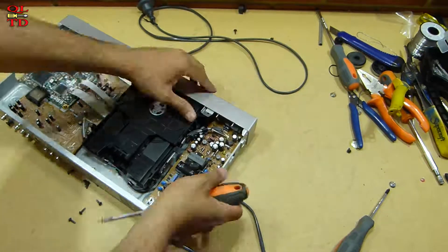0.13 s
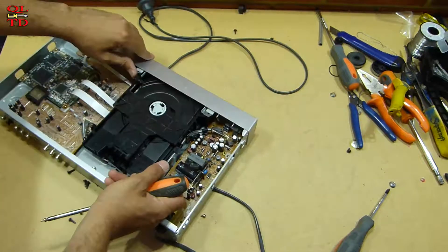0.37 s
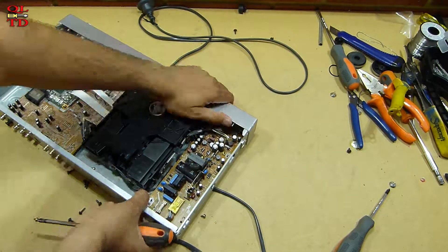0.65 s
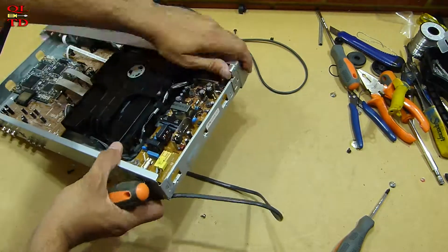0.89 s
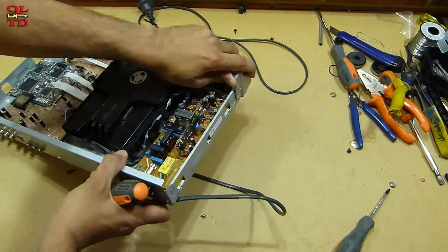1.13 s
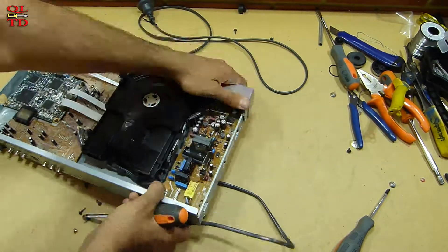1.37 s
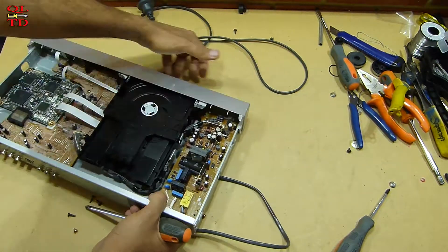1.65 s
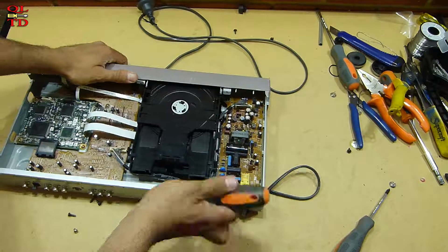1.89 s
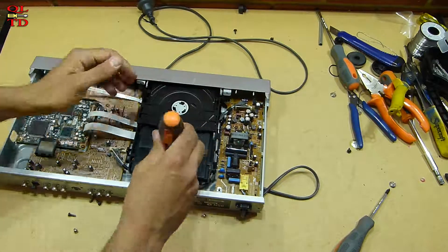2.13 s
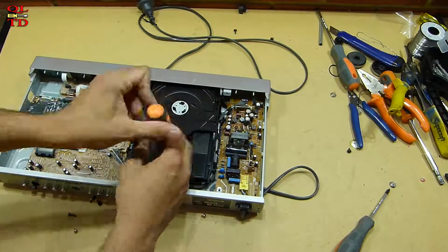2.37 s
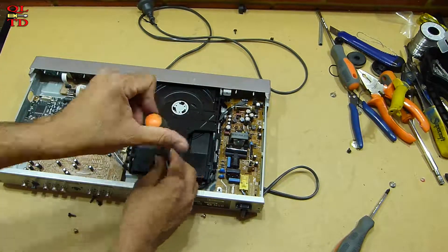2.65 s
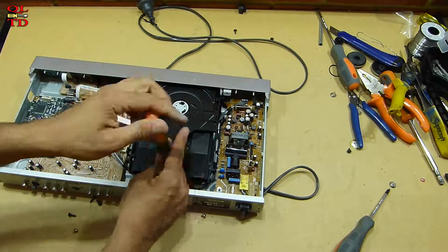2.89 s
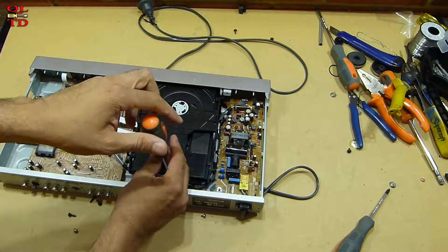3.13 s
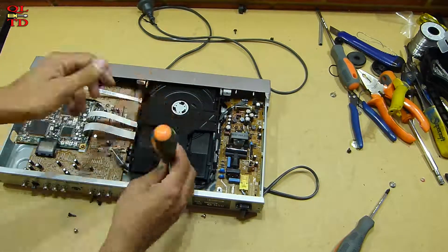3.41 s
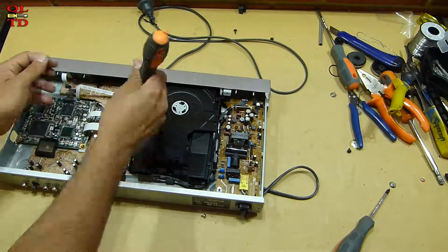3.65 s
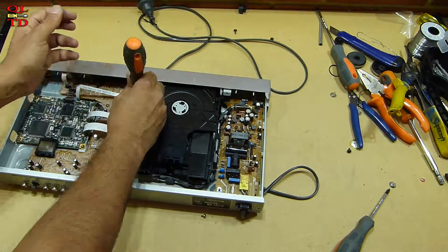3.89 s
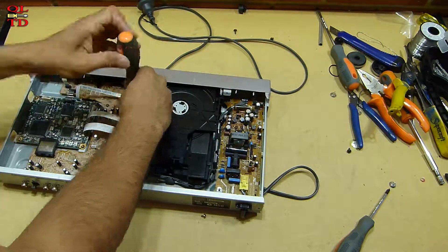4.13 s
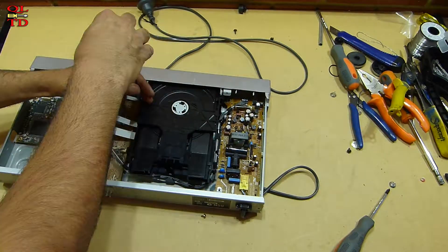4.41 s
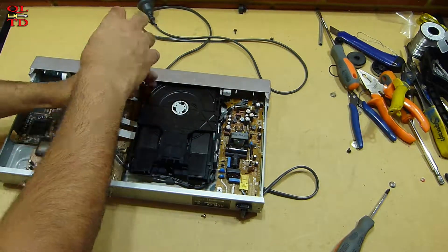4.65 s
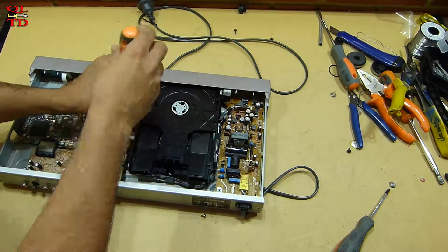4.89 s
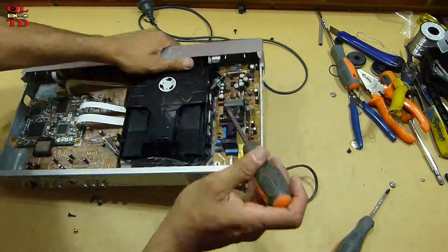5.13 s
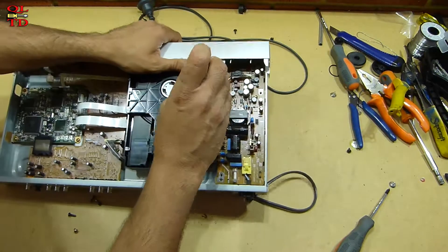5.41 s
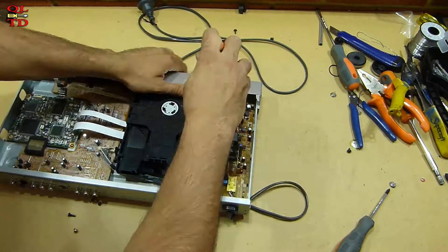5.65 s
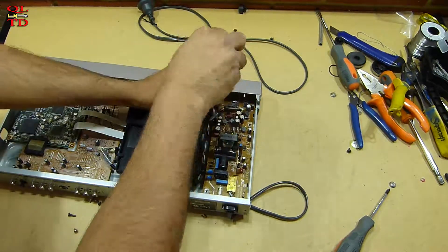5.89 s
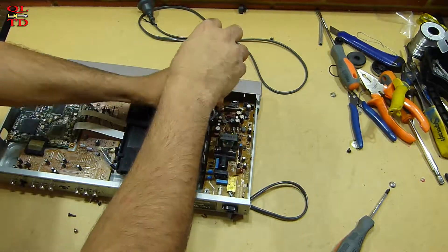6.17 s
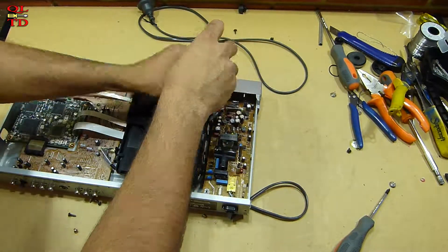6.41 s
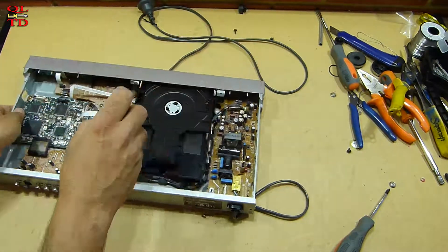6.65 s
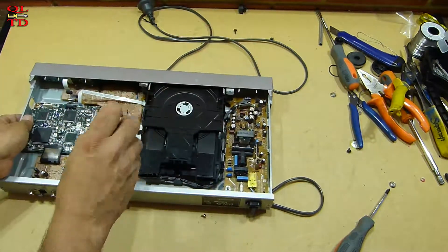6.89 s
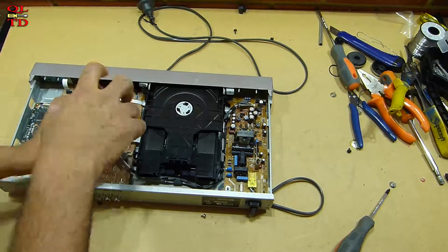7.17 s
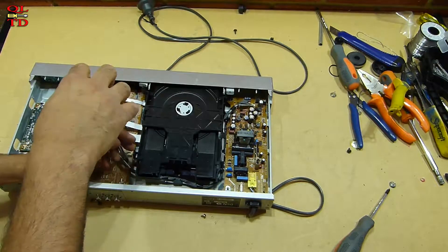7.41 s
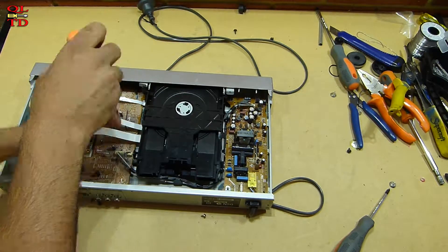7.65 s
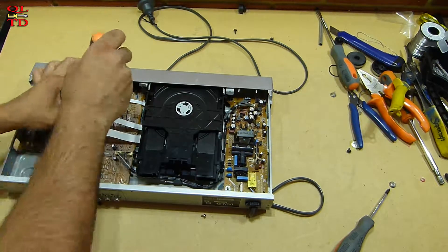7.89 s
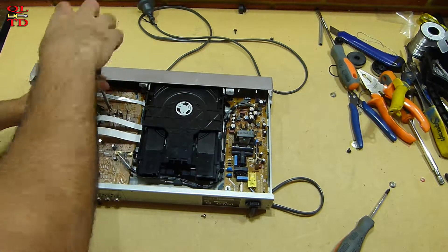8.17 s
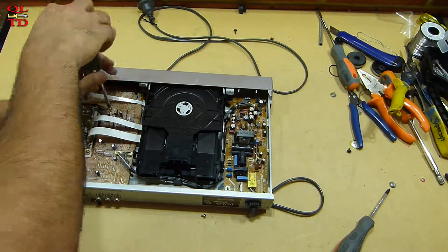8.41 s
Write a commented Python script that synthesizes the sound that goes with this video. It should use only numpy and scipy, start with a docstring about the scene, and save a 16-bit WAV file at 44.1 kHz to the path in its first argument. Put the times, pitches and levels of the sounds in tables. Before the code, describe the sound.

An open sheet-metal casing is dragged over a wooden workbench, grating and whistling thinly, with three hollow knocks in the first two seconds. Then it rests while a screwdriver taps, skids and scrapes on steel and plastic, with dull hand rubs on the wood. Gripping hands later shorten the ring. Clicks grow dense near the end. Close stereo microphone, small dry room, light hiss.

```python
"""Hands first drag an open sheet-metal chassis over a wooden workbench: feet grate, edges whistle, its hollow booms.
After about two seconds it rests and a screwdriver taps, slips and scrapes; palms rub the wood for a while.
From 5 to 7.3 s hands grip the casing and its ring is shorter; taps and scrapes go on to the end.
Noise bursts shake ringing bodies (bench, plastic tray, thin steel) for taps and slips, uneven noise for rubbing.
Filtered noise gives the small dry room's hiss and murmur throughout; a close stereo microphone listens."""
import sys
import numpy as np
from scipy import signal
from scipy.fft import rfft, irfft
from scipy.io import wavfile
from scipy.ndimage import uniform_filter1d

SR = 44100
rng = np.random.default_rng(int(sys.argv[2]) if len(sys.argv) > 2 else 0)


def inscribe(sig):
    """Save sig as 16-bit PCM at rate SR to the path in sys.argv[1].

    A 1-D sig is mono; a 2-D sig holds one channel per row.
    Samples are clipped to [-1, 1] before scaling.
    """
    pcm = np.round(np.clip(np.atleast_2d(sig).T, -1, 1) * 32767)
    wavfile.write(sys.argv[1], SR, pcm.astype(np.int16))


def volts(x):
    """Linear amplitude factor 10**(x/20) for a level x in dB, scalar or array-like."""
    e = np.asarray(x, float) / 20
    return 10 ** e


N = 376173  # length in samples

# Ringing modes of each body: f/Hz, relative level/dB, t60/s (time to fade by 60 dB, when no hand grips)
BENCH_MODES = [(231, -3, 0.29), (329.5, 25, 0.048), (375, 23, 0.027), (519, 19.5, 0.019)]
TRAY_MODES = [(845, 5.3, 0.068), (1010, 6.6, 0.034), (1135, 13.8, 0.016), (1370, 13.8, 0.021),
              (1660, 11.2, 0.04)]
STEEL_MODES = [(2100, -4, .03), (2190, -4, .03), (2330, -3, .04), (2535, -3, .05), (2660, -3, .04),
               (2760, -4, .03), (3010, -3, .03), (3140, -1, .02), (3470, -3, .03)]
CRACK_MODES = [(3514, 0.65, 0.032), (3970, 6.5, 0.012), (4426, 14.1, 0.0051), (5620, 13.1, 0.0033),
               (6000, 0.54, 0.009), (6570, 5.3, 0.0047)]  # lower treble of the metal
SIZZLE_MODES = [(8100, 11.5, 0.0019), (9320, 11.8, 0.0013), (11150, 6.6, 0.0018), (12800, 1.6, 0.0042)]  # upper treble of the metal
# Favoured pitches, depending on where hand or tool bears: t/s, steel f/Hz, tray f/Hz, crack f/Hz
SPOT_PITCHES = [(0.02, 2640, 1400, 5930), (.74, 2290, 1090, 4330), (.95, 1990, 1320, 3540),
                (1.18, 3000, 1370, 6200), (1.36, 2060, 945, 3820), (1.62, 2440, 824, 4040),
                (2.14, 2310, 960, 5500), (2.75, 2454, 830, 6500), (3.68, 2640, 1430, 3570),
                (4.8, 2675, 1370, 5900), (5.09, 2490, 1030, 4450), (5.4, 3410, 1580, 4190),
                (6.28, 3120, 1170, 4000), (6.9, 2510, 1500, 3480), (7.47, 2390, 1510, 3860),
                (8.5, 2570, 1500, 4840)]
SLIDE_END_S = 1.95  # dragged until then; afterwards the chassis rests and the screwdriver works


def taps():
    """Sudden contacts ring every body with a dying noise burst; a short push also shoves the bench top."""
    # Taps, energy as that of a 1 ms burst: t/s, steel level/dB, brightness/dB (sizzle over steel),
    # bench level/dB, tray level/dB
    tap_table = [(0.0164, -15.5, 7.5, -20, -21.5), (0.042, -43, 20, -25.5, -53),
                 (0.345, -28.5, 6.5, -28, -29), (0.354, -36, 2, -18.5, -47), (0.457, -34, 6.5, -56, -41),
                 (0.366, -15, 1.5, -43, -23), (0.5559, -20.5, 2.5, -17, -22),
                 (0.5994, -24.5, 0.5, -33, -29.5), (0.68, -19, -3.5, -14.5, -19),
                 (0.742, -21, 7.5, -58, -38), (0.7683, -32.5, 11, -38, -47), (0.7867, -28.5, 4.5, -42, -37),
                 (0.9332, -40.5, 16, -22.5, -28), (0.9693, -45, 28, -33, -36), (0.986, -42, 18, -43, -42),
                 (1.0224, -47, 24, -44, -50), (1.045, -45.5, 28, -67, -38), (1.0825, -27, 8.5, -45, -29),
                 (1.1103, -23, -2, -31, -28.5), (1.138, -26.5, 3, -48, -30),
                 (1.1773, -9.5, 1.5, -34.5, -16.5), (1.318, -50, 7, -52, -37),
                 (1.3641, -15.5, 1, -19.5, -21), (1.3896, -23, -24, -28, -29),
                 (1.513, -21.5, -2, -32, -30.5), (1.5371, -25, -4, -36, -35), (1.577, -31, -4, -52, -39),
                 (1.589, -31, 1, -52, -44), (1.6231, -16.5, -0.5, -15.5, -17), (1.702, -31, -8, -42, -39),
                 (1.72, -17.5, -8, -43, -25.5), (1.767, -26, 8, -17.5, -28), (1.799, -27, -1, -32, -38),
                 (1.841, -42, 0, -14.5, -34), (1.852, -16.5, 2.5, -30, -22), (1.863, -29, 3, -17.5, -36),
                 (2.0357, -18.5, -11, -27.5, -27), (2.143, -11.5, -4.5, -36, -25),
                 (2.1817, -22, -17, -55, -36), (2.219, -27, -10, -30, -34), (2.3179, -28, 6.5, -27, -31.5),
                 (2.4061, -22, -8.5, -30.5, -30.5), (2.6441, -23.5, -11.5, -37, -34.5),
                 (2.713, -24.5, -7, -26.5, -28), (2.7522, -9, -13.5, -23, -26),
                 (2.862, -7.5, -14, -23, -28.5), (2.985, -24, -9, -33, -37),
                 (3.0018, -14.5, -31, -37, -32.5), (3.006, -30.5, 2, -26, -34),
                 (3.1468, -11.5, -8, -30, -27), (3.21, -34, -10, -45, -46), (3.273, -18.5, -3.5, -28, -30),
                 (3.3231, -25, -5.5, -28.5, -30.5), (3.361, -24, -6, -36, -35), (3.392, -27, -7, -28, -52),
                 (3.462, -25, 4.5, -40, -35), (3.6777, -13.5, -0.5, -48, -27.5),
                 (3.7208, -29, -3, -49, -36), (3.7474, -26.5, -5, -30.5, -33),
                 (3.7694, -32, 19.5, -56, -37), (3.9027, -21, -2.5, -48, -29.5),
                 (3.9803, -10.5, -14.5, -35.5, -22.5), (4.127, -29, 11.5, -43.5, -56),
                 (4.175, -28.5, -5.5, -49, -32), (4.3417, -30.5, -12, -42, -37),
                 (4.386, -35.5, -0.5, -52, -40), (4.5013, -25.5, -23, -44, -32.5),
                 (4.541, -28, 3.5, -47, -34), (4.615, -19, -5.5, -47, -28.5), (4.649, -21, -11, -47, -29),
                 (4.7031, -17.5, -9, -40, -30), (4.7326, -10, -8, -32, -26), (4.7364, -13.5, -9, -37, -28),
                 (4.7534, -16, -7, -44, -26), (4.798, -19, -18, -43, -31), (5.063, -23.5, 8, -34, -39),
                 (5.0698, -21, 2, -58, -37), (5.0918, -19, -11, -30, -23), (5.1015, -21.5, 8, -56, -39),
                 (5.219, -57, 29.5, -66, -58), (5.2781, -20.5, -6.5, -62, -26),
                 (5.2845, -21.5, -9, -58, -25.5), (5.3827, -26, -6, -61, -29), (5.4041, -14, -3, -61, -18),
                 (5.4667, -22.5, -8.5, -64, -24.5), (5.484, -29, -8, -57, -27.5),
                 (5.5365, -17.5, -7, -30.5, -21), (5.5644, -40, 18, -54, -27),
                 (5.6104, -13.5, -4.5, -23.5, -21.5), (5.663, -17.5, -4.5, -55, -21.5),
                 (5.595, -28, -7, -55, -40), (5.988, -39.5, -9, -50, -33.5), (6.015, -35, -3, -53, -42),
                 (6.128, -18.5, -5, -39, -31.5), (6.161, -23, 0.5, -78, -32), (6.244, -27, -5, -57, -45),
                 (6.283, -9, -8, -38, -27.5), (6.3097, -15, -2, -41, -26), (6.3527, -26, -4, -54, -28),
                 (6.3748, -17.5, 4, -47, -31), (6.392, -10, -0.5, -40, -20.5),
                 (6.5724, -32.5, -1.5, -35.5, -37.5), (6.663, -25.5, -3, -41, -42),
                 (6.8411, -13, -0.5, -41, -27.5), (6.869, -15.5, -7, -57, -33),
                 (6.877, -14, -4.5, -64, -28.5), (6.9481, -6.5, -10, -56, -23), (6.967, -16, -11, -35, -34),
                 (7.01, -32, -13, -50, -52), (7.0849, -31, 15, -39, -40), (7.2552, -29.5, -7, -54, -35),
                 (7.2805, -24.5, -20, -54, -32.5), (7.315, -25.5, -5, -62, -37),
                 (7.4167, -15.5, -17, -52, -43), (7.444, -8.5, -14, -38, -18.5), (7.4742, -9, -7, -43, -22),
                 (7.8629, -12.5, -5.5, -43, -29), (7.897, -16.5, 0.5, -48, -32),
                 (7.953, -20.5, -17, -59, -37), (7.962, -11.5, 1.5, -41, -21), (8.077, -30, -18, -59, -58),
                 (8.109, -31.5, 13, -41.5, -47), (8.216, -29.5, -16, -48, -43),
                 (8.3758, -16, -19, -61, -29), (8.4127, -10.5, -10.5, -37, -20.5),
                 (8.441, -23, -11, -61, -49), (8.4735, -9, -13, -35, -42), (8.4814, -10, -13.5, -36, -24),
                 (8.4973, -12.5, -5, -32, -21.5), (8.5125, -11.5, -11, -45, -26)]
    snap_db, snap_s = 8, 0.0001  # the first touch is harder and shorter than the chatter after it
    thump_db, thump_s = -24, 0.0043  # peak over the bench column, length of the push
    s, steel, brightness, bench, tray = np.transpose(tap_table)
    push = np.hanning(int(thump_s * SR))
    thump = place(s, volts(bench + thump_db)[:, None] * push)

    def blow(t, contact_s):
        return np.exp(-t / contact_s) + volts(snap_db) * np.exp(-t / snap_s)

    return thump + strike(s, bodies(steel, brightness, bench, tray), blow)


def slips():
    """Short skids of the dragged chassis, later of the screwdriver: pressure swells and lets go, in uneven jerks."""
    # Slips, energy as for the taps: t/s, length/s (the swell takes 1.24 times this),
    # steel level/dB, brightness/dB (sizzle over steel), tray level/dB
    slip_table = [(0.276, 0.029, -26, 0, -34), (0.427, 0.021, -30, -1, -37),
                  (0.799, 0.002, -23.5, -1, -28.5), (0.943, 0.029, -16, -12, -22),
                  (1.004, 0.006, -52, 36.5, -54), (1.098, 0.0064, -28, 4, -46),
                  (1.464, 0.009, -23.5, -17, -38), (1.488, 0.024, -24.5, -10, -29),
                  (1.667, 0.0076, -42, 15, -40), (2.789, 0.012, -27.5, -15, -36),
                  (3.094, 0.0095, -30, -17, -34), (3.226, 0.019, -22.5, -3, -25),
                  (3.799, 0.022, -19.5, -2, -42), (4.457, 0.02, -29, -3, -35),
                  (4.581, 0.015, -24, -12, -34), (4.719, 0.0098, -19.5, 3, -22),
                  (4.775, 0.009, -16, -4, -28), (4.829, 0.017, -20, -10, -34),
                  (4.855, 0.025, -12.5, 5.5, -25.5), (4.895, 0.01, -18.5, 5, -44),
                  (5.018, 0.0099, -27, -7, -34), (5.157, 0.024, -29.5, -6, -32),
                  (7.162, 0.041, -32.5, -19, -50), (7.32, 0.036, -16, -15, -27),
                  (7.36, 0.0091, -8.5, -11.5, -21), (7.485, 0.0091, -10.5, -7.5, -26),
                  (7.57, 0.013, -14, -12, -29), (8.332, 0.032, -24, -16, -37)]
    bench_db = -25  # bench against steel
    s, length, steel, brightness, tray = np.transpose(slip_table)
    chance = rng.standard_normal((len(s), SR // 600 + 1))
    jerks = volts(3.4 * np.repeat(chance, 50, axis=1))  # about one jerk a millisecond

    def swell(t, _):
        progress = np.clip(t / (1.24 * length[:, None]), 0, 1)
        return jerks[:, :len(t)] * np.sin(np.pi * progress ** 0.58)

    return strike(s, bodies(steel, brightness, steel + bench_db, tray), swell)


def bodies(steel, brightness, bench, tray):
    """Level in dB of each body; a harder contact reaches further into the treble."""
    crack = steel + 1.19 + 0.56 * brightness
    return [steel, bench, tray, crack, steel + brightness]


def strike(times, body_db, shape):
    """Each contact is fresh chatter under shape(t, contact s), so every one weights the modes differently."""
    # Contact of steel, bench, tray, crack, sizzle, shaft:
    # contact time/s, side share (0-1), after-rattle level/dB, after-rattle t60/s
    contact_table = [(0.00076, 0.15, -9.5, 0.085), (0.0031, 0.12, -15, 0.16), (0.0026, 0.16, -2, 0.09),
                     (0.0015, 0.31, -6, 0.072), (0.0025, 0.55, -3.5, 0.082), (0.0002, 0.5, -18, 0.13)]
    # While a screw turns, the screwdriver shaft rings: from t/s, to t/s, level over the crack/dB
    turn_table = [(2.7, 3.45, -3.5), (4.3, 4.95, -7.5)]
    # Ringing mode of the shaft: f/Hz, relative level/dB, t60/s
    shaft_modes = [(5900, 0, 0.011)]
    bounce_db = 3  # unevenness of the after-rattle's bounces
    t = np.arange(SR // 12) / SR
    chance = rng.standard_normal((len(times), 12, len(t)))
    # a new bounce level every 2.5 ms
    steps = np.repeat(rng.standard_normal((len(times), 40)), SR // 400, axis=1)[:, :len(t)]
    bounces = volts(bounce_db * steps)
    turning = sum(volts(db) * (times > a) * (times < b) for a, b, db in turn_table)
    gains = [*volts(body_db), turning * volts(body_db[3])]
    all_modes = (STEEL_MODES, BENCH_MODES, TRAY_MODES, CRACK_MODES, SIZZLE_MODES, shaft_modes)
    out = 0
    for k, (modes, contact) in enumerate(zip(all_modes, contact_table)):
        contact_s, share, rattle_db, t60 = contact
        sound = response(modes, times)
        # loose parts and the room keep the body stirring after the contact
        rattle = volts(rattle_db) * np.exp(-np.log(1000) * t / t60) * (1 - np.exp(-t / 0.00035))
        envelope = shape(t, contact_s) + bounces * rattle
        parts = []
        for c in (0, 1):  # mid, side
            v = signal.fftconvolve(chance[:, 2 * k + c] * envelope, sound, axes=1)
            # give each contact the energy of a 1 ms burst at its level
            v = v * gains[k][:, None] * np.sqrt(SR / 1000 / np.sum(v ** 2, axis=1, keepdims=True))
            parts.append(place(times, v))
        out = out + stereo(*parts, share)
    return out


def response(modes, times):
    """One impulse response per contact; steel, tray and crack change with the spot."""
    if modes is STEEL_MODES:
        return np.array([steel_at(s) for s in times])
    if modes is TRAY_MODES or modes is CRACK_MODES:
        column = 1 + (modes is CRACK_MODES)
        return np.array([body(favour(modes, s, column)) for s in times])
    return body(modes)[None]


def steel_at(s):
    """The steel at time s; the panel under the tool adds one damped mode near the favoured pitch."""
    pitch = np.interp(s, *np.transpose(SPOT_PITCHES)[:2])
    hz = pitch * (1 + 0.04 * rng.standard_normal())  # differs from touch to touch
    panel = (hz, 14.5, 0.013)  # Hz, relative dB, t60 in s when not gripped
    return body(favour(sorted(STEEL_MODES + [panel]), s, column=0))


def favour(modes, s, column):
    """Modes far from the pitch favoured at time s are weaker; a gripped casing rings broader and shorter."""
    # Fall away from the favoured pitch, not gripped; steel, tray, crack: fall/(dB per octave)
    spot_fall = [46, 26.5, 8.5]
    held = [(0, SLIDE_END_S), (5.0, 7.3)]  # hands grip the casing: from s, to s
    near = np.interp(s, np.transpose(SPOT_PITCHES)[0], np.transpose(SPOT_PITCHES)[column + 1])
    # shares left of the fall and of the t60
    focus, damp = (0.56, 0.59) if any(a <= s < b for a, b in held) else (1, 1)
    fall = focus * spot_fall[column]
    return [(hz, db - fall * abs(np.log2(hz / near)), damp * t60) for hz, db, t60 in modes]


def body(modes):
    """Impulse response of decaying modes, energy 1; little radiates below the lowest mode."""
    t = np.arange(SR // 10) / SR
    y = 0
    for hz, db, t60 in modes:
        y = y + volts(db) * np.exp(-np.log(1000) * t / t60) * np.sin(2 * np.pi * hz * t)
    y = signal.sosfilt(signal.butter(3, modes[0][0], "high", fs=SR, output="sos"), y)
    return y / np.sqrt(np.sum(y ** 2))


def place(times, rows):
    """Sum one short sound per row at its time."""
    where = (times * SR).astype(int)[:, None] + np.arange(rows.shape[1])
    return np.bincount(where.ravel(), rows.ravel(), N)[:N]


def stereo(mid, side, share):
    """Left and right from a common and an opposed part."""
    share = np.clip(share, 0, 1)
    return (mid + share * side * np.array([[1], [-1]])) / np.sqrt(1 + share ** 2)


def knocks():
    """The chassis knocks down on the bench and the air in its hollow booms briefly."""
    # Knocks: t/s, energy level/dB
    knock_table = [(0.945, -0.5), (1.364, 0.5), (1.623, 6.5), (5.093, -8.5)]
    # Ringing mode of the hollow: f/Hz, relative level/dB, t60/s
    hollow_modes = [(579, 0, 0.025)]
    s, db = np.transpose(knock_table)
    return place(s, volts(db)[:, None] * body(hollow_modes))


def rub():
    """Dense uneven slips shake steel, bench and the fine treble modes."""
    t = np.arange(N) / SR
    sliding = t < SLIDE_END_S
    steel, treble, stir = friction(t)
    # dragged feet catch in quick sharp grains; resting parts tick now and then
    grains = np.where(sliding, unit(clumps(0.003, 3.4)), unit(clumps(0.0056, 3.6)))
    mid, side = unit(grains * rng.standard_normal((2, N)))
    # broad grinding in four bands, each in its own patches
    grit = 0
    for low_hz in 1100 * 1.5 ** np.arange(4):
        band = signal.butter(1, [low_hz, 1.5 * low_hz], "band", fs=SR, output="sos")
        grit = grit + unit(clumps(0.02, 5.6)) * signal.sosfilt(band, stereo(mid, side, 0.31))
    plates = ring_along(stereo(mid, side, 0.16), STEEL_MODES)
    plates = plates + volts(-13.5) * ring_along(stereo(mid, side, 0.054), TRAY_MODES)
    # while dragged, the wide plates also sing in short streaks
    streaks = shimmer(stereo(mid, side, 0.48), (1500, 5500), count=20)
    dragged = volts(-2.0) * plates + volts(6.5) * grit + streaks
    metal = np.where(sliding, dragged, plates + volts(5.5) * grit)
    fine = ring_along(stereo(mid, side, 0.6), CRACK_MODES)
    fine = fine + volts(3.5) * ring(stereo(mid, side, 0.23), SIZZLE_MODES)
    # thin edges whistle while the chassis is dragged
    whistle = shimmer(stereo(mid, side, 0.72), (5800, 15360), count=64)
    fine = fine + sliding * volts(13) * whistle
    shaking = unit(clumps(0.012, 3) * rng.standard_normal((2, N)))
    bench = stir * ring(stereo(*shaking, 0.12), BENCH_MODES)
    return volts(-6.0) * steel * metal + bench + volts(-7.0) * treble * fine


def friction(t):
    """Gains of steel, treble and bench: the drag on its feet and single scrapes of tool and fingers."""
    # Drag, steel and treble before the mix in rub(): t/s, steel level/dB, treble level/dB, bench level/dB
    drag_table = [(0.0, -43.5, -53, -54), (0.13, -62, -64, -56), (0.4, -45.5, -60, -48.5),
                  (0.8, -44, -54.5, -55.5), (0.96, -37.5, -33, -54), (1.03, -43.5, -43, -75),
                  (1.23, -47.5, -59, -59), (1.39, -40, -58, -51.5), (1.6, -46.5, -75, -48),
                  (1.842, -32, -35, -52), (2.0, -63.5, -73, -55)]
    # Scrapes, before the mix in rub(): loudest at t/s, swell/s, fade/s (both at least 0.01 s),
    # steel level/dB, treble level/dB
    scrape_table = [(2.39, 1, 1, -48, -49), (2.751, 0.064, 0.11, -28.5, -44),
                    (3.021, 0.058, 0.083, -30.5, -41), (3.35, 1, 0.22, -39, -53),
                    (3.78, 0.097, 0.37, -37.5, -57), (4.6, 0.61, 0.27, -38.5, -67),
                    (4.881, 0.11, 0.092, -29.5, -25.5), (5.067, 0.13, 0.17, -30, -32),
                    (5.59, 0.16, 0.25, -39, -37), (5.93, 0.56, 0.53, -47, -54),
                    (6.255, 0.025, 0.085, -26, -29), (6.139, 0.088, 0.042, -27.5, -32),
                    (6.286, 0.065, 0.063, -23, -25), (6.429, 0.34, 0.11, -33, -38),
                    (6.69, 0.23, 0.22, -41.5, -33.5), (7.13, 0.17, 0.11, -41.5, -67),
                    (7.44, 0.34, 0.2, -33, -59), (7.582, 0.043, 0.061, -26, -37),
                    (8.13, 0.086, 0.059, -38.5, -35), (8.53, 0.52, .1, -36, -61)]
    fall_db = 36.5  # how far a scrape lies below its peak one swell before and one fade after
    # the bench stirs on while hands lean on the chassis, then lies almost still
    lean_end_s, lean_db, still_db = 3.45, -52.5, -71
    s, *columns = np.transpose(drag_table)
    drag = [volts(np.interp(t, s, c)) * (t < s[-1]) for c in columns]
    power = 0
    for peak, swell, fade, *db in scrape_table:
        away = np.maximum((peak - t) / max(swell, 0.01), (t - peak) / max(fade, 0.01))
        power = power + volts(np.array(db)[:, None] - fall_db * away) ** 2
    steel, treble = np.hypot(drag[:2], np.sqrt(power))
    resting = (t >= s[-1]) * volts(np.where(t < lean_end_s, lean_db, still_db))
    return steel, treble, drag[2] + resting


def ring(x, modes):
    """Let a body sound under the force x."""
    return signal.fftconvolve(x, body(modes)[None], axes=1)[:, :N]


def ring_along(x, modes):
    """Let a body sound under the force x while the spot moves on in steps."""
    s = np.transpose(SPOT_PITCHES)[0]
    edges = np.r_[0, (SR * (s[1:] + s[:-1]) / 2).astype(int), N]
    out = np.zeros((2, N + SR))
    for a, b, y in zip(edges, edges[1:], response(modes, s)):
        out[:, a:b + len(y) - 1] += signal.fftconvolve(x[:, a:b], y[None], axes=1)
    return out[:, :N]


def shimmer(x, band_hz, count):
    """Many narrow modes at random pitches in the band, each flaring up on its own."""
    out = 0
    for hz in rng.uniform(*band_hz, size=count):
        sharpness = 140 * np.sqrt(hz / 15360)
        mode = signal.lfilter(*signal.iirpeak(hz, sharpness, SR), x)
        out = out + clumps(0.027, 4.4) * mode
    return unit(out)


def clumps(clump_s, spread_db):
    """Gain that moves to a new level every clump_s, now and then much higher."""
    k = int(clump_s * SR)
    levels = np.minimum(rng.exponential(size=N // k + 1), 4)
    return volts(spread_db * uniform_filter1d(np.repeat(levels, k), k // 2)[:N])


def unit(x):
    """Scale to rms 1."""
    return x / np.sqrt(np.mean(x ** 2))


def knead():
    """Palms and forearms press on the wood: dull uneven rumble from band-passed jolting noise."""
    # Hands on the bench top: from t/s, to t/s, level/dB, top f/Hz
    knead_table = [(3.088, 3.16, -44, 306), (3.16, 3.359, -38, 560), (3.353, 3.43, -38, 1050),
                   (3.606, 3.815, -44.5, 820)]
    edge = 0.18  # share of the length taken by the swell and by the release
    t, out = np.arange(N) / SR, 0
    jolts = clumps(0.012, 4) * rng.standard_normal((2, N))
    for a, b, db, top_hz in knead_table:
        rumble = signal.sosfilt(signal.butter(3, [135, top_hz], "band", fs=SR, output="sos"), jolts)
        press = np.clip(np.minimum(t - a, b - t) / (edge * (b - a)), 0, 1)
        out = out + volts(db) * press * stereo(*unit(rumble), 0.78)
    return out


def hum():
    """A weak tone with its octave glides up and fades."""
    # One list per faint rising hum: t/s, f/Hz, level/dB of the lower tone
    hum_table = [
        [(0.72, 327, -75), (0.768, 375, -50), (0.92, 390, -61)],
    ]
    t, out = np.arange(N) / SR, 0
    for s, hz, db in map(np.transpose, hum_table):
        phase = 2 * np.pi * np.cumsum(np.interp(t, s, hz)) / SR
        fade = np.interp(t, [s[0] - 0.03, s[0], s[-1], s[-1] + 0.022], [0, 1, 1, 0])
        tone = np.sin(phase) + 0.25 * np.sin(2 * phase)
        out = out + np.sqrt(2) * fade * volts(np.interp(t, s, db)) * tone
    return out


def air():
    """Steady room murmur, nearly alike in both channels, under a much less related hiss."""
    # Colour of the room noise: f/Hz, relative level per Hz/dB
    air_colour = [(25, -19), (140, -17), (339, -11.5), (687, -7.5), (1220, -4.5), (2400, -7), (7110, -14),
                  (13600, -12.5), (15000, -29), (16500, -60)]
    # Width of the room noise: f/Hz, side share (0-1)
    air_width = [(60, 0.7), (300, 0.35), (1400, 0.17), (3100, 0.6), (6800, 1)]
    hz = np.log(np.maximum(np.fft.rfftfreq(N, 1 / SR), 1))
    colour, share = (np.interp(hz, np.log(f), v) for f, v in map(np.transpose, (air_colour, air_width)))
    mid, side = rfft(rng.standard_normal((2, N))) * volts(colour)
    return volts(-51) * unit(irfft(stereo(mid, side, share), N))


def scene():
    """Work on the bench in its room."""
    return taps() + slips() + knocks() + rub() + knead() + hum() + air()


def low_pass(x):
    """Removes everything above the highest recorded frequency."""
    return signal.sosfilt(signal.butter(12, 16840, fs=SR, output="sos"), x)


def record(dry):
    """Stereo microphone: bass roll-off, the right port slightly late and softer, hard ceiling."""
    mic_hz, left_db = 97, 0.12  # the right port is turned down by as much as the left is raised
    right_lag_s = 1.3e-5  # the work lies a little nearer the left port
    thin = signal.sosfilt(signal.butter(1, mic_hz, "high", fs=SR, output="sos"), dry)
    delay = np.exp(-2j * np.pi * np.fft.rfftfreq(N, 1 / SR) * right_lag_s)
    late = irfft(rfft(thin[1]) * delay, N)
    ports = np.array([thin[0], late]) * volts([[left_db], [-left_db]])
    return low_pass(np.clip(ports, -1, 1))


dry = scene()
out = record(dry)
inscribe(out)
```